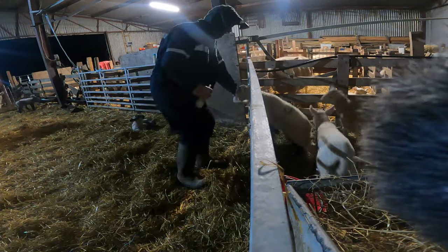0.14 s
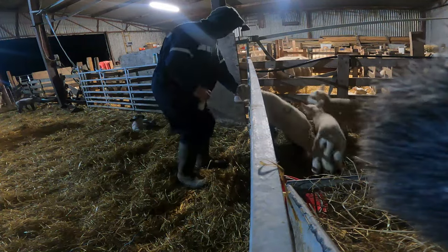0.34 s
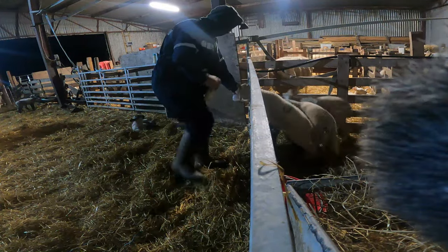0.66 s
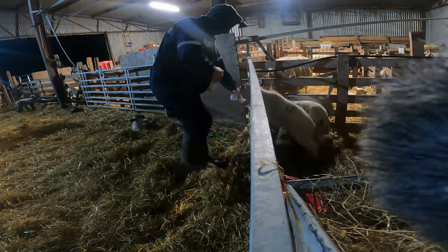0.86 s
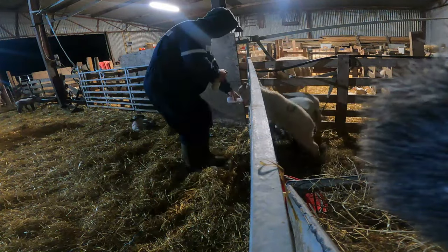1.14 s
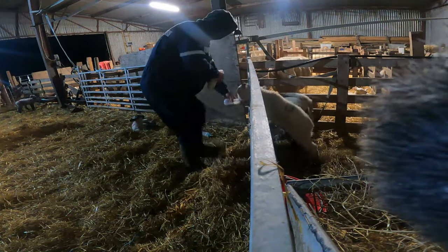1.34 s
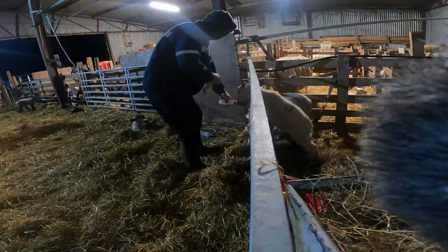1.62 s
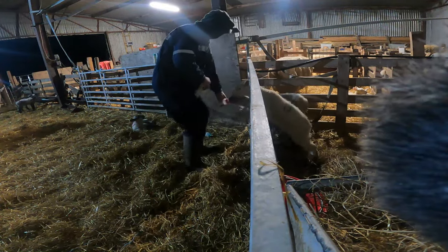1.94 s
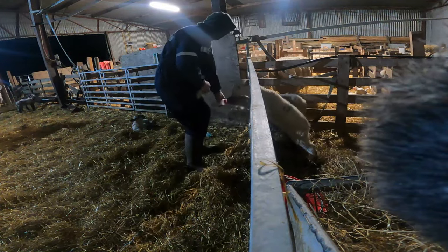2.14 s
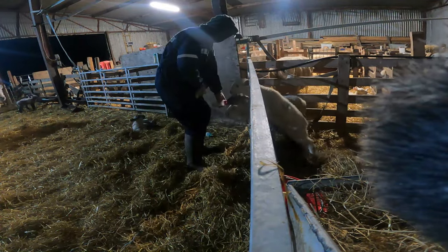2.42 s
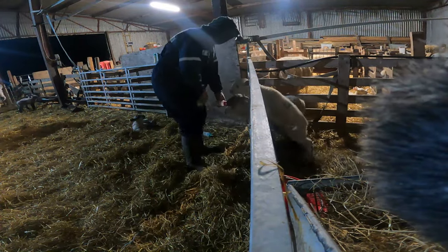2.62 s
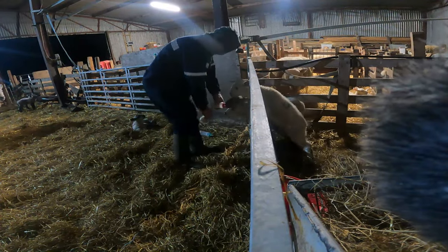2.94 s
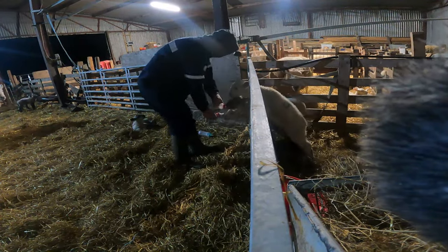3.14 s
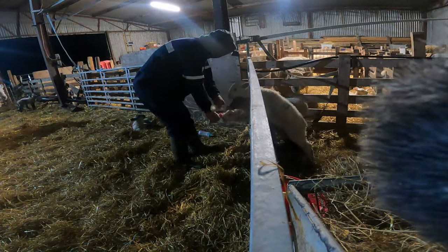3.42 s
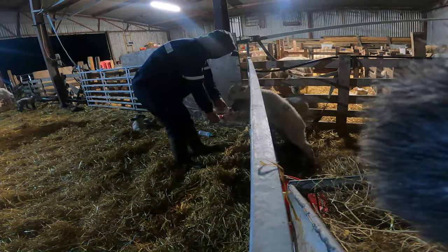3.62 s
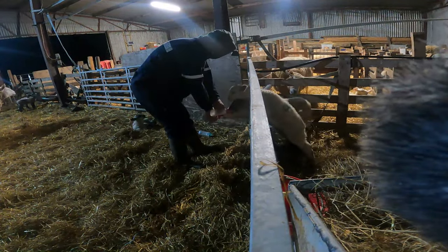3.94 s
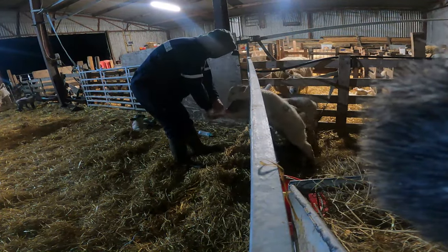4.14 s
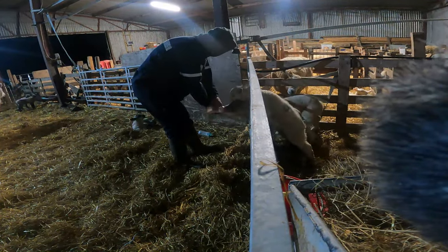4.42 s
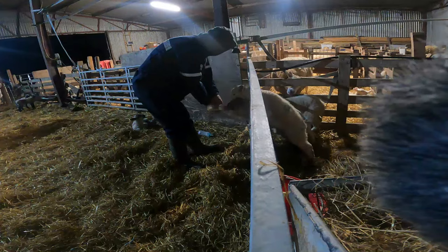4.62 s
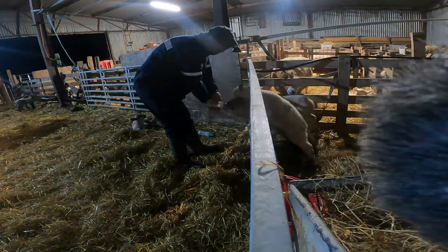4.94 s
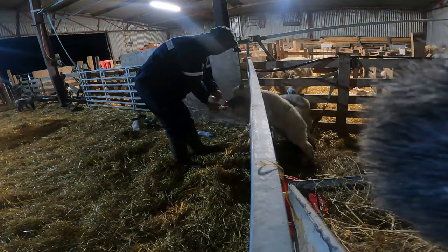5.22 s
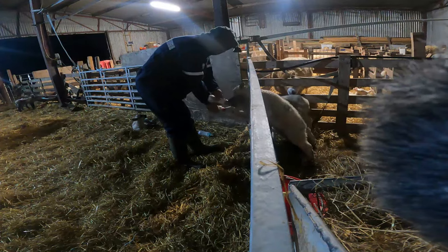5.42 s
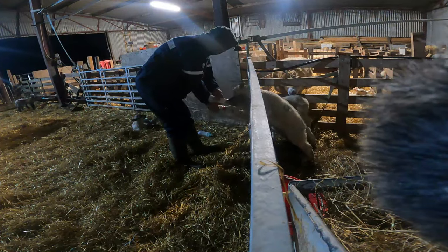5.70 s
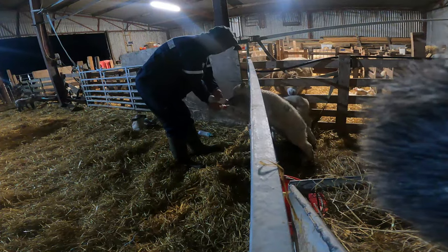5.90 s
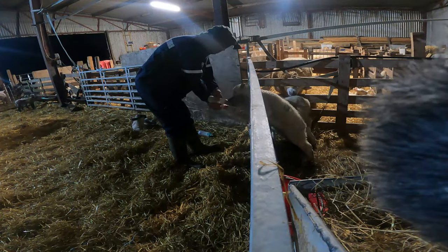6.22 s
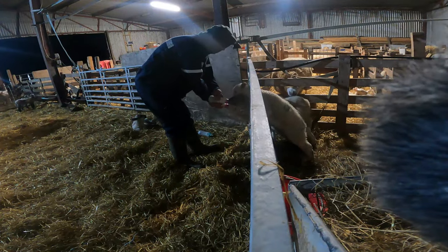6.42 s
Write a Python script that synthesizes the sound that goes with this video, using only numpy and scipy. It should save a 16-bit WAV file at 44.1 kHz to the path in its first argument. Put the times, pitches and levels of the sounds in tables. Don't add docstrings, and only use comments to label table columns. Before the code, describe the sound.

A diesel engine idles steadily at some distance, a deep throbbing hum with soft roar and faint metallic ticking. Close to the microphone, which is fixed to a pen rail, straw rustles and small clicks and scuffs come and go over low shudders. Just before four seconds a hollow tap leads to a hurdle knock that rattles briefly; later a tiny rubbery squeak and a crisp click. Short, dull shed echo.

```python
import sys
import numpy as np
from scipy import signal
from scipy.fft import rfft, irfft, next_fast_len
from scipy.io import wavfile
from scipy.ndimage import map_coordinates

SR = 44100
rng = np.random.default_rng(int(sys.argv[2]) if len(sys.argv) > 2 else 0)


def transcribe(signal):
    frames = np.atleast_2d(signal).T
    limited = np.clip(frames, -1, 1)
    pcm = np.round(limited * 32767).astype(np.int16)
    wavfile.write(sys.argv[1], SR, pcm)


def linear_from_db(decibels):
    return 10 ** (np.asarray(decibels, float) / 20)


N = 289721


def unit(x):
    return x / np.sqrt(np.mean(x ** 2) + 1e-20)


def along(points, hz):
    f, v = np.transpose(points)
    return np.interp(np.log(hz + 1), np.log(f + 1), v)


def curves(rows):
    s, *cols = np.transpose(rows)
    return [np.interp(np.arange(N) / SR, s, c) for c in cols]


def during(rows):
    t = np.arange(N) / SR
    return (t > rows[0][0]) & (t < rows[-1][0])


def wobble(rate):
    knots = rng.standard_normal(int(N * rate / SR) + 4)
    return map_coordinates(knots, [np.arange(N) * rate / SR])


def swells(rows):
    out = np.zeros(N)
    for s, db, half in rows:
        first = max(round((s - 3 * half) * SR), 0)
        last = min(round((s + 3 * half) * SR), N)
        near = np.arange(first, last)
        out[near] += linear_from_db(db) * np.exp(-((near / SR - s) / half) ** 2)
    return out


def filtered(x, response):
    m = next_fast_len(N + SR)
    return irfft(rfft(x, m) * response(np.fft.rfftfreq(m, 1 / SR)), m)[:N]


def bandpassed(x, low_hz, high_hz):
    return signal.lfilter(*signal.butter(2, [low_hz, high_hz], "band", fs=SR), x)


def resonant(x, modes):
    def peaks(f):
        total = 0
        for k, (hz, width, db) in enumerate(modes):
            total = total + (-1) ** k * linear_from_db(db) * 1j * f * width / (hz * hz - f * f + 1j * f * width)
        return total
    return unit(filtered(x, peaks))


def narrow(x, hz, width):
    return unit(filtered(x, lambda f: (1j * f * width / (hz * hz - f * f + 1j * f * width)) ** 2))


def strength(swing):
    return np.abs(signal.hilbert(swing, next_fast_len(N))[:N])


def even(swing, slack):
    return unit(swing / (strength(swing) + slack))


def crackle(rate, spread_db):
    grains = (rng.random(N) < rate / SR) * linear_from_db(spread_db * rng.exponential(size=N))
    return rng.standard_normal(N) * (1 + np.convolve(grains, np.hanning(64), "same"))


def strokes(rows):
    out = np.zeros(N + SR)
    for s, length, db, hz, width in rows:
        u = np.arange(round(length * SR)) / (length * SR)
        bumps_db = 2.8 * np.repeat(rng.standard_normal(SR // 8), 90)[:SR // 8]
        grit = rng.standard_normal(SR // 8) * linear_from_db(bumps_db)
        grit = bandpassed(grit, max(hz - width / 2, 300), min(hz + width / 2, 15000))[:len(u)]
        out[round(s * SR):][:len(u)] += linear_from_db(db) * unit(grit) * np.sin(np.pi * u ** 0.66)
    return out[:N]


def struck(blow, modes):
    out, t = np.zeros(N + SR), np.arange(SR // 6) / SR
    waver = 0.048 * np.cumsum(rng.standard_normal((len(modes), len(t))), axis=1)
    ring = 0
    for (hz, db, t60), drift in zip(modes, waver):
        ring = ring + linear_from_db(db - 60 * t / t60) * np.sin(2 * np.pi * hz * t + drift)
    out[round(blow[0] * SR):][:len(t)] = linear_from_db(blow[1]) * (1 - np.exp(-t / 0.002)) * ring
    return out[:N]


def shed(x):
    # pitch_hz, t60_s
    echo_s = [(150, 0.52), (1000, 0.58), (4000, 0.24), (12000, 0.11)]
    hz, t, z = signal.stft(rng.standard_normal(SR * 3 // 4), SR, nperseg=256)
    tail = signal.istft(z * linear_from_db(-60 * t / along(echo_s, hz)[:, None]), SR, nperseg=256)[1]
    return signal.fftconvolve(np.pad(x, (500, 0)), tail / np.linalg.norm(tail))[:N]


def straw():
    # start_s, stir_db
    stir = [(0, -68.5), (.41, -66.5), (.45, -76), (.5, -68), (.9, -63), (1.03, -68.5), (1.18, -70),
            (1.35, -62.5), (1.64, -73), (1.72, -69), (2.45, -66.5), (2.56, -68.5), (2.85, -66.5),
            (3.05, -72), (4.05, -71.5), (4.66, -76.5), (5.07, -87), (5.7, -86), (6.16, -72.5), (6.57, -72)]
    # start_s, fine_db, half_length_s, stalks_over_fine_db
    rustles = [(0.0, -69, 0.0088, 15), (0.064, -66, 0.027, -9), (0.133, -69, .006, 4),
               (0.253, -66, 0.019, 5), (.42, -70, 0.011, 9), (0.53, -69, 0.012, -8), (0.955, -63, 0.03, 3),
               (1.991, -63, 0.0071, 18), (2.87, -66, 0.027, 2), (3.33, -73.5, 0.028, 13),
               (3.48, -73, 0.017, 12), (3.813, -72, 0.0098, 17), (3.866, -66.5, 0.011, 21),
               (4.073, -74, .04, -5), (4.203, -73, 0.012, 7), (4.333, -82, 0.011, -3), (4.49, -72, .04, -5),
               (4.662, -72, .025, 1), (5.296, -70, 0.02, 8), (5.468, -68, 0.024, 5), (5.84, -75, 0.066, 7),
               (6.182, -69, 0.033, 3), (6.537, -72, .03, 5)]
    # pitch_hz, level_db (per Hz)
    wool = [(3000, -10), (7000, 2.5), (10500, 2.5), (14000, 5), (16000, -1.5)]
    # pitch_hz, level_db (per Hz)
    stalks = [(900, 1.5), (2200, 4), (5000, -6.5), (8000, 0), (10000, -9), (13000, -16), (16000, -30)]
    stir_db, = curves(stir)
    fine = linear_from_db(stir_db) + swells([row[:3] for row in rustles])
    coarse = linear_from_db(-64.5 + stir_db + 70.5)
    coarse = coarse + swells([(s, db + over, half) for s, db, half, over in rustles])
    out = 0
    for gain, colour in zip((fine, coarse), (wool, stalks)):
        rustle = filtered(crackle(120, spread_db=1.0), lambda hz: linear_from_db(along(colour, hz)) * (hz > 500))
        out = out + gain * linear_from_db(0.75 * wobble(30)) * unit(rustle)
    return out


def brushes():
    # start_s, length_s, level_db (rms), centre_hz, width_hz
    passes = [(.225, .05, -64, 3000, 3000), (0.942, 0.086, -59, 2000, 3000), (.945, 0.05, -47.5, 600, 600),
              (1.044, .04, -54, 1200, 1600), (1.979, 0.056, -49, 600, 600), (2.717, .025, -58, 2700, 1400),
              (3.884, 0.018, -55, 6500, 4000), (5.2722, .006, -51, 2200, 2800),
              (4.915, .007, -57, 2600, 1600), (1.972, 0.1, -53, 2510, 4260),
              (2.466, 0.077, -61, 2500, 1500), (2.842, 0.069, -63, 6500, 4000),
              (3.296, 0.06, -64, 7300, 2600), (3.467, 0.037, -58, 3470, 4970),
              (5.278, 0.031, -67, 3000, 4000), (6.199, 0.12, -60, 3600, 2000),
              (6.495, .04, -53.5, 2400, 2500)]
    return strokes(passes)


def scuffs():
    # start_s, length_s, level_db (rms), centre_hz, width_hz
    scrapes = [(0.0005, .008, -56, 3800, 1600), (1.973, .006, -55, 6200, 1500),
               (1.985, .011, -46, 1750, 600), (1.995, .012, -53, 4400, 500), (2.025, .009, -58, 5400, 900),
               (2.476, .02, -59, 2100, 400), (2.718, .018, -51, 2250, 600), (3.28, .068, -64, 8300, 900),
               (3.298, .04, -63, 6300, 700), (3.324, .012, -59, 3000, 2000),
               (3.329, .014, -68, 10400, 1200), (3.478, .012, -60, 3500, 1200),
               (3.478, .015, -63, 7800, 1800), (3.883, .014, -57, 6600, 800),
               (3.895, .055, -50, 1900, 1300), (3.945, .05, -56, 2500, 1800),
               (3.985, .026, -56, 2300, 1100), (6.215, .025, -60, 3200, 900), (6.213, .028, -64, 4900, 900),
               (6.255, .09, -65, 3720, 250), (6.498, .012, -57, 3000, 1000)]
    return strokes(scrapes)


def squeak():
    # start_s, pitch_hz, level_db (rms)
    slip = [
        (4.734, 930, -70),
        (4.74, 940, -54),
        (4.747, 1150, -56),
        (4.756, 1070, -52),
        (4.765, 965, -46),
        (4.772, 945, -48),
        (4.784, 940, -52),
        (4.794, 930, -66),
    ]
    hz, db = curves(slip)
    turn = 2 * np.pi * np.cumsum(hz) / SR
    tone = np.sin(turn + .5 * wobble(200))
    tone = tone + 0.33 * np.sin(1.2 * turn + wobble(300))
    tone = tone + 0.27 * np.sin(.8 * turn + wobble(270))
    return during(slip) * np.sqrt(2) * linear_from_db(db + 1.1 * wobble(150)) * tone


def contacts():
    # start_s, peak_db, main_ring_hz, second_ring_hz, crack_db
    dull = [(0.946, -41, 900, 1640, -7), (0.959, -38, 1450, 1690, -6), (1.047, -46, 1550, 1780, -8),
            (1.978, -40, 1750, 2180, -11), (1.986, -42, 930, 1680, 1), (2.002, -44, 1450, 4300, 0),
            (2.027, -44, 1530, 1780, -8), (2.191, -45, 2130, 3300, -3), (6.228, -43.5, 1360, 3250, -3)]
    # start_s, peak_db, main_ring_hz, second_ring_hz
    pins = [(.238, -48, 2370, 2880), (1.8964, -45, 2280, 3770), (2.4694, -48, 2090, 2150),
            (2.4994, -41, 2410, 2250), (2.5144, -43, 2300, 3360), (2.7215, -41, 2250, 3150),
            (2.9731, -42, 2170, 3330), (4.9157, -38, 2300, 2850), (6.2194, -48, 3500, 3360),
            (6.4991, -45, 3260, 2240)]
    # start_s, peak_db, main_ring_hz, second_ring_hz, crack_db
    snaps = [(.5252, -47, 9000, 7500, 3), (.9574, -43, 7880, 5000, 0), (1.9872, -35, 8000, 4270, -5),
             (3.2994, -50, 6430, 8200, -6), (3.3294, -48, 8380, 6300, -5), (3.8222, -38, 7850, 2860, -9),
             (4.1784, -47, 8420, 9500, 0), (4.3294, -53, 11000, 8040, 3), (5.2762, -42, 7860, 3330, 1)]
    rows = [(*r, 0.052) for r in dull] + [(*r, -10, .04) for r in pins] + [(*r, 0.021) for r in snaps]
    out, t = np.zeros(N + SR), np.arange(SR // 8) / SR
    for s, db, main_hz, second_hz, crack_db, t60 in rows:
        waver = np.cumsum(rng.standard_normal((2, len(t))), axis=1) * 0.035
        ring = np.sin(2 * np.pi * main_hz * t + waver[0])
        ring = ring + 0.81 * np.sin(2 * np.pi * second_hz * t + waver[1])
        low_hz = min(main_hz, second_hz) * .4
        high_hz = min(max(main_hz, second_hz) * 1.4, 15000)
        crack = linear_from_db(crack_db) * unit(bandpassed(rng.standard_normal(len(t)), low_hz, high_hz))
        fade = linear_from_db(db - 4.5 - 60 * t / t60) * (1 - np.exp(-t / .0005))
        out[round(s * SR):][:len(t)] += fade * (ring + crack)
    return out[:N]


def tap():
    # start_s, peak_db
    blow = (3.7203, -35)
    # pitch_hz, level_db, t60_s
    tub = [(175, 0, 0.069), (616, 6.5, 0.04), (900, 2.5, 0.043), (1045, 6, 0.029), (1400, -2, 0.032),
           (1870, -6, .03), (2800, -5, 0.024)]
    return struck(blow, tub)


def rebounds():
    # start_s, level_db (rms), half_length_s, pitch_hz
    parts = [(3.864, -44, 0.014, 603), (3.857, -43.5, 0.0086, 1340), (3.872, -50, .012, 1720),
             (3.89, -57, .02, 2180), (3.89, -53, 0.011, 690), (3.908, -48, .012, 1004),
             (3.905, -51, .01, 1360), (3.925, -47, 0.015, 545), (3.932, -47, 0.016, 770),
             (3.94, -49, 0.013, 1400), (3.945, -51, .012, 370), (3.984, -47, 0.018, 425),
             (3.992, -60, .016, 2200), (3.995, -52, .014, 770), (4.035, -53, .012, 1160),
             (1.984, -43.5, .004, 920), (1.991, -45, 0.0035, 1790), (1.99, -44, .003, 8200),
             (1.997, -52, .004, 4350), (2.022, -47, .004, 1780), (2.004, -50, .005, 1600),
             (.963, -48.5, .006, 1450), (2.506, -55, .007, 2100), (2.724, -58, 0.006, 3200),
             (2.509, -57, .008, 2400), (2.515, -55.5, 0.0066, 3400), (2.98, -63, .005, 2000),
             (4.918, -50.5, 0.003, 2300), (4.739, -53, .004, 930), (5.5, -55, .006, 3760),
             (3.857, -50, .005, 5700), (3.856, -53, .007, 2800), (3.92, -52, .014, 1650),
             (1.98, -50, .003, 2120), (.324, -61, .022, 1000), (0.41, -63, .025, 1010),
             (.519, -63, .018, 990), (5.277, -56, .006, 3330)]
    out, t = np.zeros(N + SR), np.arange(-SR // 16, SR // 16) / SR
    for s, db, half, hz in parts:
        waver = .045 * np.cumsum(rng.standard_normal(len(t)))
        swell = np.sqrt(2) * linear_from_db(db) * np.exp(-(t / half) ** 2)
        out[round(s * SR) - SR // 16:][:len(t)] += swell * np.sin(2 * np.pi * hz * t + waver)
    return out[:N]


def clicks():
    # start_s, peak_db, lowest_hz, highest_hz
    taps = [(.134, -48, 6000, 11000), (1.9925, -38, 400, 2500), (2.262, -46, 7000, 10000),
            (2.467, -42, 8500, 12000), (3.7222, -35, 500, 3200), (3.8235, -43, 6300, 8800),
            (3.8435, -40, 700, 3000), (3.852, -36, 3500, 8500), (1.988, -39, 6500, 11000),
            (3.895, -40, 2000, 9000), (4.9163, -36, 1900, 4200), (5.273, -31, 700, 3800),
            (5.2737, -50, 6000, 12000), (5.277, -35, 6000, 14000), (6.247, -40, 3300, 5600)]
    out = np.zeros(N + SR)
    for s, db, low_hz, high_hz in taps:
        click = bandpassed(np.arange(SR // 100) == 0, low_hz, high_hz)
        out[round(s * SR):][:len(click)] += linear_from_db(db) * click / np.abs(click).max()
    return out[:N]


def hurdle():
    # level_db, attack_s, hold_s, sag in the hold (dB/s), fall after it (dB/s)
    shakes = [
        (-36.5, 0.031, 0.072, 10, 72),
        (-43, 0.0034, 0.14, 49, 150),
        (-48.5, 0.0045, 0.061, 130, 500),
    ]
    # pitch_hz, width_hz, level_db
    boards = [(175.7, 12.5, 11.5), (414, 57, -3.5), (570, 146, -5), (810, 240, -8)]
    bars = [(990, 300, -1.5), (1360, 270, 0.5), (1750, 480, 1), (2400, 770, -1.5), (3300, 1080, -6.5)]
    rattle = [(4260, 900, -3), (5600, 900, 4), (6960, 1900, -0.5), (8900, 2200, -8)]
    # start_s, peak_db
    blow = (3.847, -37)
    # pitch_hz, level_db, t60_s
    plank = [(590, 1.5, 0.09), (1345, -4, 0.047), (1750, -5, 0.12), (2360, -9, 0.068), (5700, -22, 0.035)]
    t = np.maximum(np.arange(N) / SR - 3.846, 0)
    out = 0
    for (db, attack, hold, sag, fall), modes in zip(shakes, (boards, bars, rattle)):
        level_db = db - sag * np.minimum(t, hold) - fall * np.maximum(t - hold, 0)
        rise = 1 - np.exp(-(t / attack) ** 2)
        out = out + linear_from_db(level_db) * rise * resonant(crackle(500, spread_db=.3), modes)
    return out + struck(blow, plank)


def rail():
    # pitch_hz, width_hz
    modes = [
        (12.5, 8.3),
        (31, 11.1),
        (58, 20.3),
        (102, 34),
        (181, 15),
    ]
    # level_db (near a lean of -30 dB), gain per dB of lean, unsteadiness_db,
    # jolt_db, gain per dB of hardness
    answer = [
        (-30, 0.87, 2.5, -13, -1.1),
        (-48, 0.57, 4.5, -1.5, 0),
        (-52, 0.5, 0, -19.5, 0.71),
        (-69, 0.8, 2, -26, 0.4),
        (-62.5, 0.3, 3, -34, 0.67),
    ]
    # start_s, sway_db
    lean = [(0, -29.5), (.5, -40.5), (.95, -31), (1.15, -25.5), (1.42, -22.5), (1.55, -42), (1.9, -30),
            (2.42, -21.5), (2.75, -30), (3.0, -23), (3.4, -32), (3.55, -19.5), (3.78, -18.5), (3.93, -36),
            (4.25, -25.5), (4.8, -35.5), (5.4, -29.5), (6.57, -47)]
    # start_s, level_db, half_length_s, hardness_db
    jolts = [(0.693, -26, 0.052, -1), (0.905, -43, 0.058, 13), (1.124, -33, 0.037, -4),
             (1.422, -38, 0.043, 2), (1.7, -33.5, 0.064, 2), (1.973, -32, 0.056, 8),
             (2.096, -34, 0.033, 19), (2.205, -23.5, 0.041, -4), (2.376, -32.5, 0.037, 13),
             (2.58, -17, 0.049, 4.5), (2.698, -26, 0.028, 8), (2.923, -20.5, 0.051, -7),
             (3.003, -31, .03, 13), (3.16, -31.5, 0.063, 0), (3.513, -32, 0.053, 13),
             (3.773, -27, 0.059, 6), (3.985, -26, 0.056, 8), (4.093, -20, 0.058, -3),
             (4.165, -33, 0.06, -10), (4.417, -38, 0.035, -9), (4.865, -49, 0.13, -13),
             (5.512, -53, 0.045, 8)]
    lean_db, = curves(lean)
    out = 0
    for (db, grow, uneven_db, jolt_db, hard), (hz, width) in zip(answer, modes):
        swing = narrow(rng.standard_normal(N), hz, width)
        push = linear_from_db(db + grow * (lean_db + 29) + uneven_db * wobble(6.4))
        push = push + swells([(s, level + jolt_db + hard * edge, half) for s, level, half, edge in jolts])
        pushed = push * even(swing, slack=0.091)
        out = out + filtered(pushed, lambda f: 1 / np.sqrt(1 + ((f - hz) / (1.05 * width)) ** 6))
    return out


def valve_ticks(turns):
    valves = [
        (0.275, 1),
        (0.612, -0.5),
        (0.94, -6.5),
    ]
    ticks = sum(linear_from_db(db) * np.exp(-((turns - place) % 1) / 0.069) for place, db in valves)
    return ticks * linear_from_db(.8 * wobble(25))


def engine_hum(turns, cycle_hz):
    # multiple of the cycle, level_db (rms)
    clear = [(3, -36), (8, -58), (9, -58), (11, -56), (12, -48), (13, -62), (14, -55), (15, -44), (16, -57),
             (21, -62), (23, -64), (24, -68), (25, -63), (26, -68), (28, -62), (33, -62), (34, -67),
             (35, -66), (36, -58), (38, -66), (39, -63), (40, -68), (41, -63), (44, -67), (45, -69),
             (51, -64), (63, -67), (75, -69), (111, -71), (120, -74)]
    # pitch_hz, level_db (rms)
    weak = [(40, -74), (65, -95), (100, -99), (200, -75), (450, -74.5), (800, -83), (1400, -97)]
    # pitch_hz, lag_s
    lag = [(30, .094), (170, .094), (330, .108), (380, .108), (395, .151), (450, .151)]
    order = np.arange(3, 131)
    hz = order * cycle_hz
    level_db = along(weak, hz) + 3 * rng.standard_normal(len(order))
    for k, db in clear + [(3, -40.0), (6, -53.0), (17, -79), (18, -69.5), (57, -68), (58, -72.0)]:
        level_db[int(k) - 3] = db
    spread = along([(170, .2), (200, 5), (310, 5), (330, .2), (430, .3), (480, 6)], hz)
    scatter = spread * rng.standard_normal(len(order))
    phase = -2 * np.pi * cycle_hz * np.cumsum(along(lag, hz)) + scatter
    cycle = np.arange(1024) / 1024
    waves = np.cos(2 * np.pi * np.outer(order, cycle) + phase[:, None])
    shape = (np.sqrt(2) * linear_from_db(level_db)) @ waves
    hum = map_coordinates(shape, [turns % 1 * 1024], mode="grid-wrap")
    return hum * linear_from_db(0.54 * wobble(6.01))


def engine_roar(ticks):
    # pitch_hz, level_db (per Hz)
    colour = [(41, -47), (75, -8.5), (151, -4.5), (207, -12.5), (298, -15.5), (365, -16), (703, -20.5),
              (753, -19), (900, -21), (1000, -20), (1330, -24), (2130, -21), (2990, -28), (5270, -31),
              (5900, -36.5), (7910, -37), (15600, -53.5)]
    throb = rng.standard_normal(N) * (1 + .5 * ticks)
    roar = unit(filtered(throb, lambda hz: linear_from_db(along(colour, hz)) * (hz > 40)))
    return linear_from_db(-49.0 + 0.35 * wobble(3.57) + 0.62 * wobble(14)) * roar


def panels(ticks):
    # pitch_hz, width_hz, level_db (rms), strike over rasp (ratio)
    plates = [
        (5330, 330, -69.5, 11),
        (5940, 48, -82, 0),
        (8030, 1100, -76.5, 0),
    ]
    strikes = np.maximum(np.diff(ticks, prepend=0) - .05, 0)
    out = 0
    for hz, width, db, strike in plates:
        rasp = rng.standard_normal(N) * (0.15 + ticks)
        out = out + linear_from_db(db + .7 * wobble(2.96)) * narrow(rasp + strike * strikes, hz, width)
    return out


def covers(ticks):
    # pitch_hz, width_hz
    sheets = [
        (3963, 33),
        (4716, 32),
        (6433, 27),
    ]
    usual_db = [-74.5, -75, -78]
    # start_s, level_db, half_length_s
    loud_fits = [
        [(0.833, -66, 0.027), (1.132, -68.0, 0.021), (1.2, -72, 0.2), (1.202, -70.0, 0.031),
         (1.327, -67.0, 0.031), (1.532, -63, 0.025), (3.02, -71, 0.06), (3.63, -71, 0.05),
         (3.697, -70.0, 0.024), (4.056, -70.0, 0.014), (4.116, -65, 0.03), (4.225, -66, 0.016),
         (4.285, -69.0, 0.022), (4.46, -70.0, 0.027), (4.62, -69.0, 0.036), (4.7, -72.5, 0.35),
         (4.999, -70.0, 0.029), (5.488, -70.0, 0.027), (5.647, -70.0, 0.041), (6.166, -67, 0.025),
         (6.4, -69.5, 0.12)],
        [(0.434, -63, 0.031), (2.95, -72, 0.05), (3.093, -71.0, 0.017), (3.148, -69, 0.02),
         (3.417, -69.0, 0.016), (3.477, -67.0, 0.069), (3.58, -72, 0.05), (3.776, -71.0, 0.032),
         (4.565, -70.0, 0.046), (4.854, -70.0, 0.018), (4.969, -71.0, 0.022), (5.068, -72.0, 0.017),
         (5.672, -66, 0.026), (5.867, -71.0, 0.033), (5.927, -68.0, 0.022), (6.0, -68.5, 0.13),
         (6.036, -65, 0.052), (6.45, -68, 0.043)],
        [(0.314, -69, 0.051), (0.783, -75.5, 0.048), (1.322, -74.0, 0.016), (1.452, -73.0, 0.023),
         (1.616, -74, 0.018), (1.806, -72, 0.017), (2.405, -70, 0.053), (2.878, -75.0, 0.024),
         (3.37, -75, 0.04), (5.682, -75.0, 0.056), (6.43, -72, 0.023), (6.52, -76, 0.03)],
    ]
    out = 0
    for db, fits, (hz, width) in zip(usual_db, loud_fits, sheets):
        gain = np.hypot(linear_from_db(db + 2.5 * wobble(18)), swells(fits))
        buzz = narrow(rng.standard_normal(N) * (0.28 + ticks), hz, width)
        out = out + gain * even(buzz, slack=1.0)
    return out


def engine():
    cycle_hz = 10.189
    turns = cycle_hz * np.arange(N) / SR + 0.0028 * wobble(1.201)
    ticks = valve_ticks(turns)
    return engine_hum(turns, cycle_hz) + engine_roar(ticks) + panels(ticks) + covers(ticks)


def scene():
    near = contacts() + brushes() + tap()
    mix = near + linear_from_db(-14.5) * shed(near)
    mix = mix + straw() + scuffs() + squeak() + rebounds() + clicks()
    mix = mix + hurdle() + rail() + engine()
    return mix[None]


def low_pass(x):
    return signal.sosfilt(signal.butter(12, 15750, fs=SR, output="sos"), x)


def record(dry):
    kept = filtered(dry[0], lambda hz: hz < 15700)
    return low_pass(kept[None])


dry = scene()
out = record(dry)
transcribe(out)
```